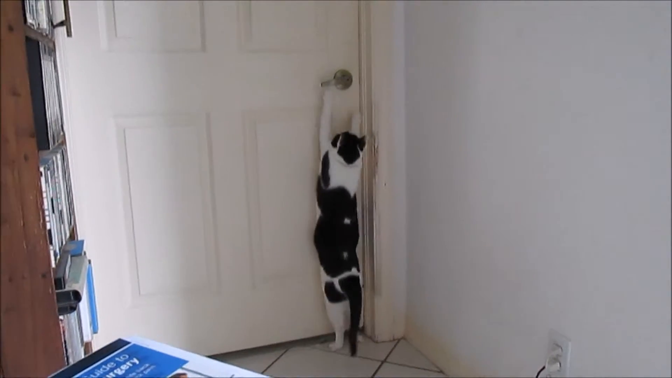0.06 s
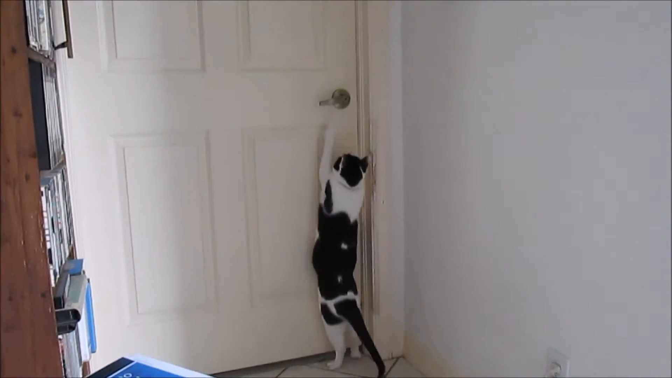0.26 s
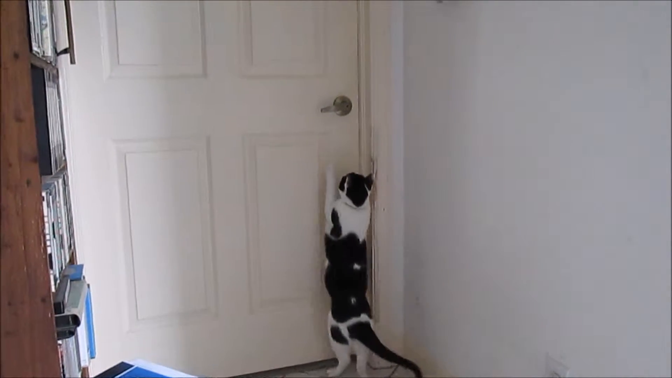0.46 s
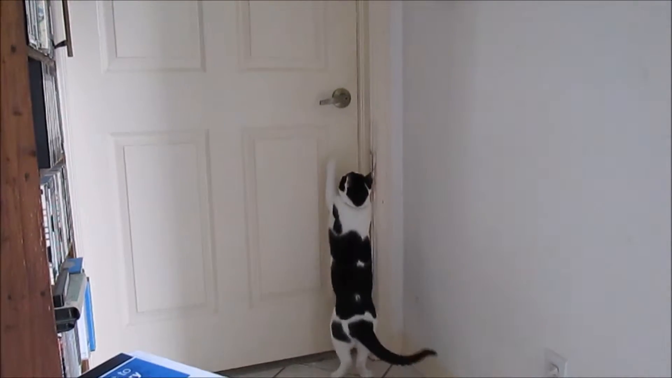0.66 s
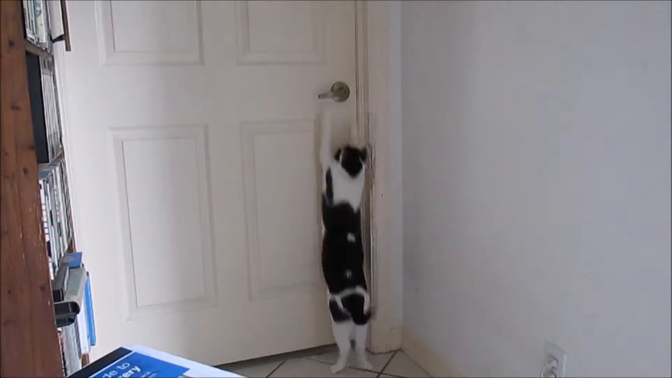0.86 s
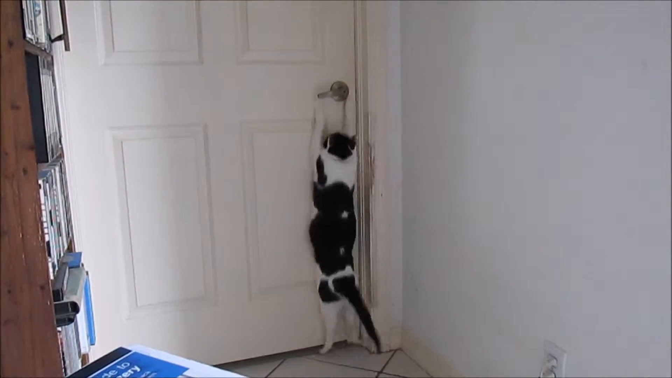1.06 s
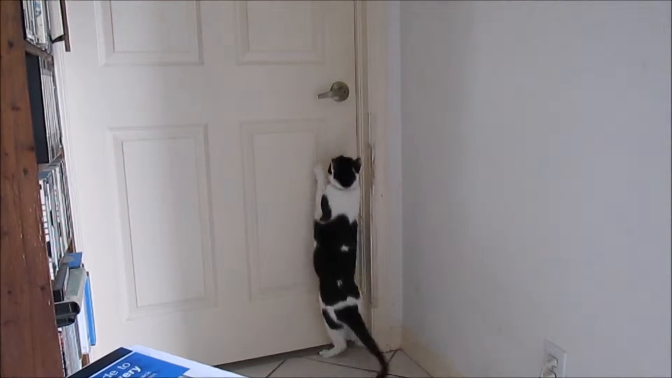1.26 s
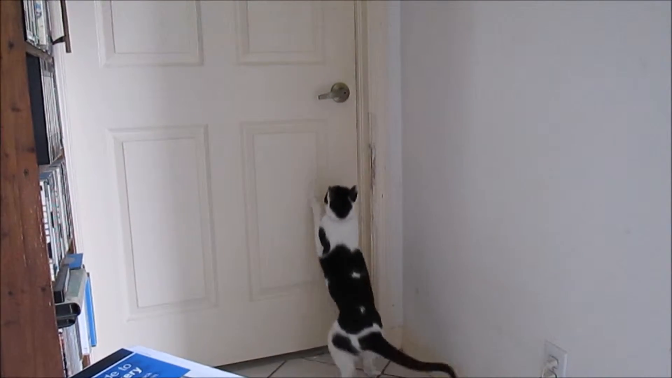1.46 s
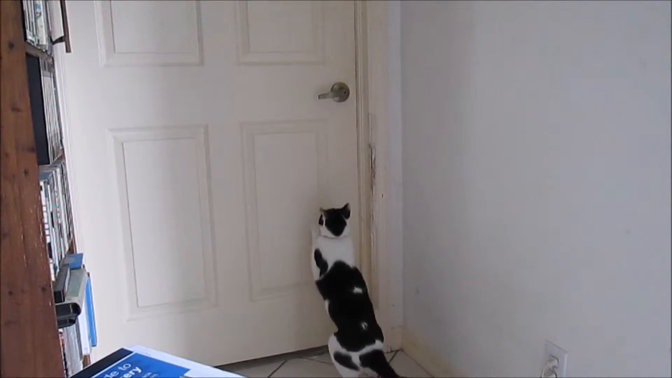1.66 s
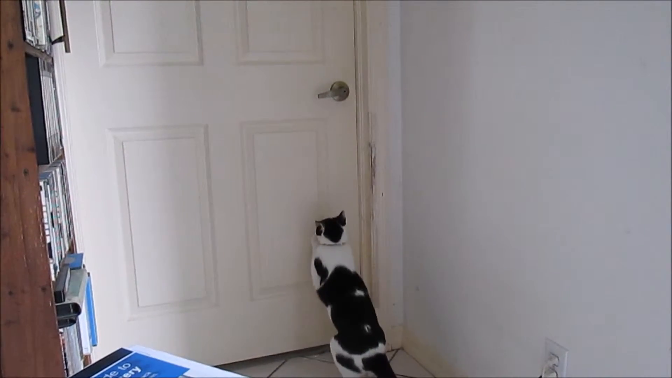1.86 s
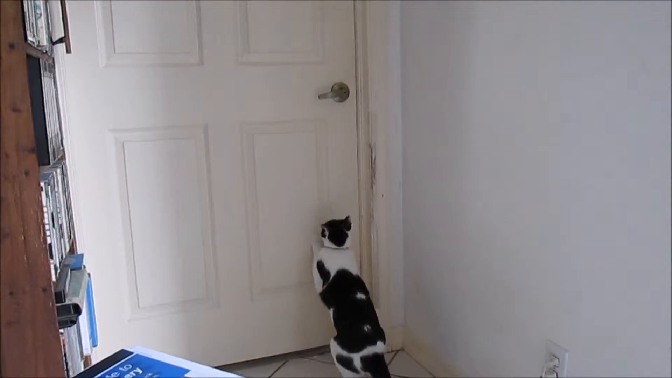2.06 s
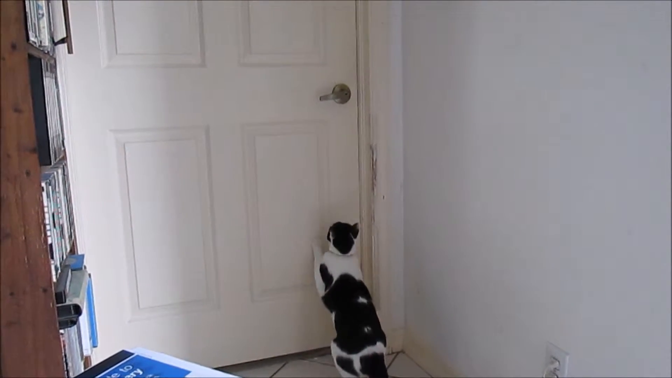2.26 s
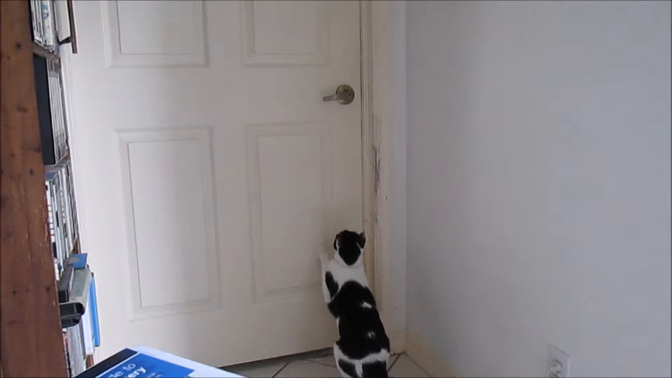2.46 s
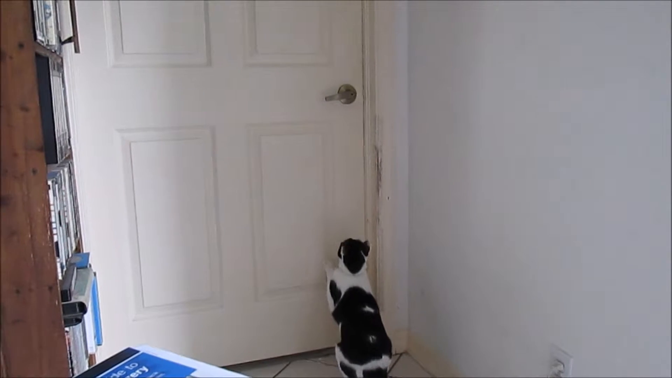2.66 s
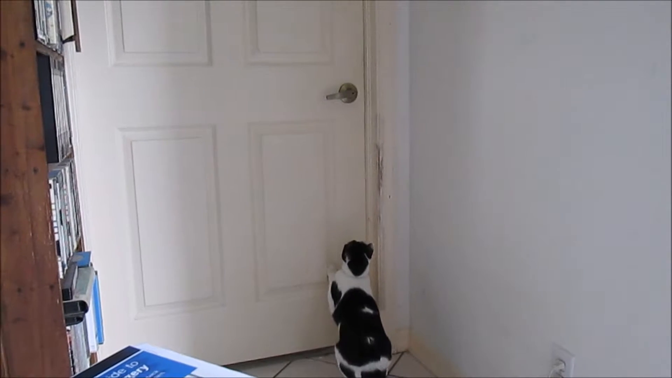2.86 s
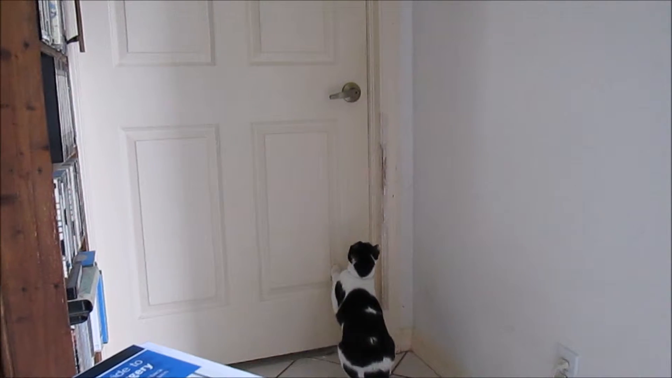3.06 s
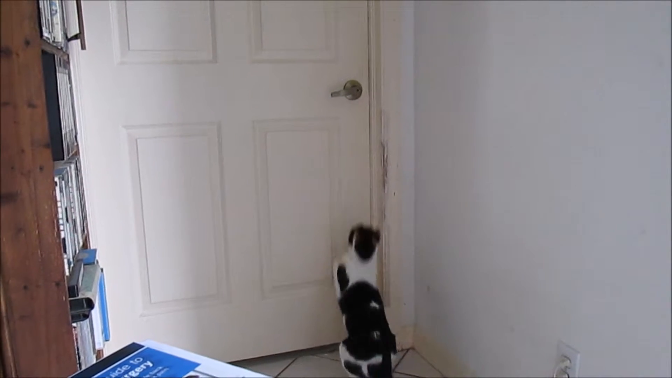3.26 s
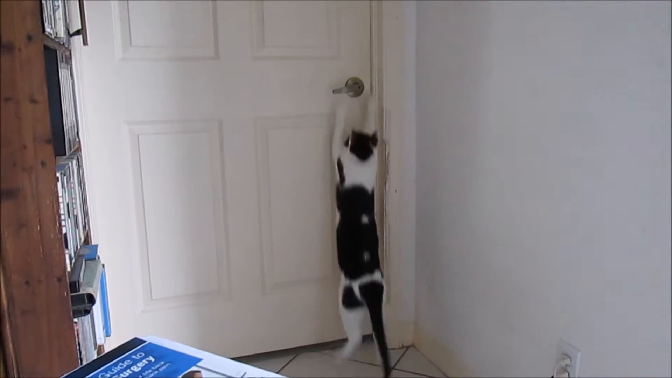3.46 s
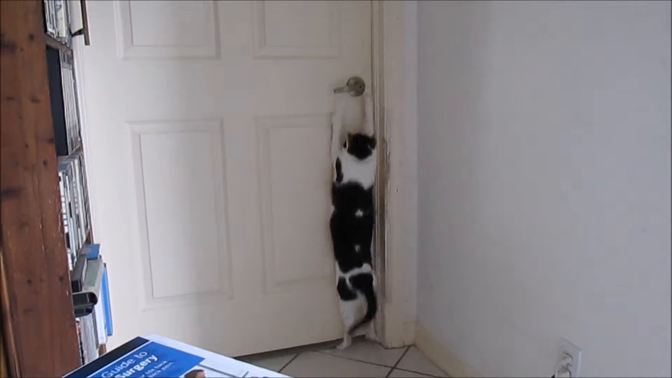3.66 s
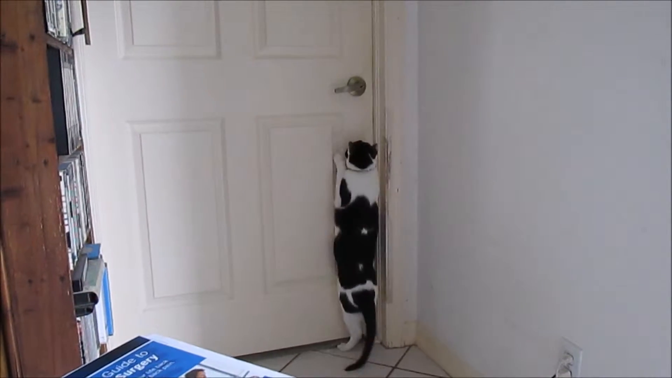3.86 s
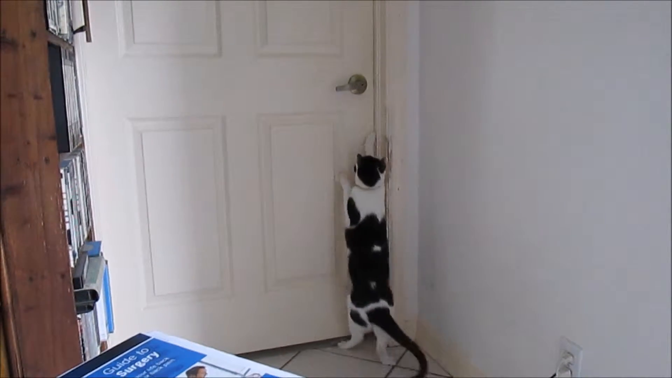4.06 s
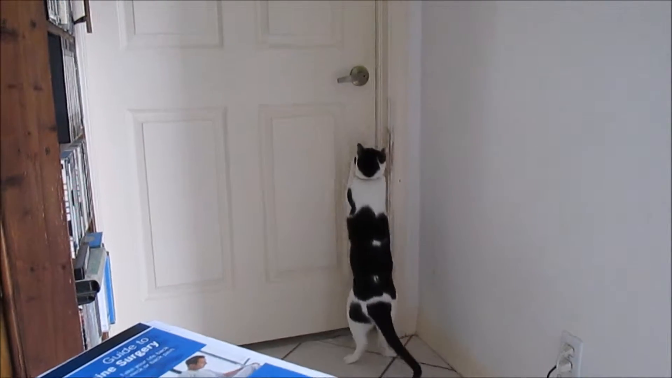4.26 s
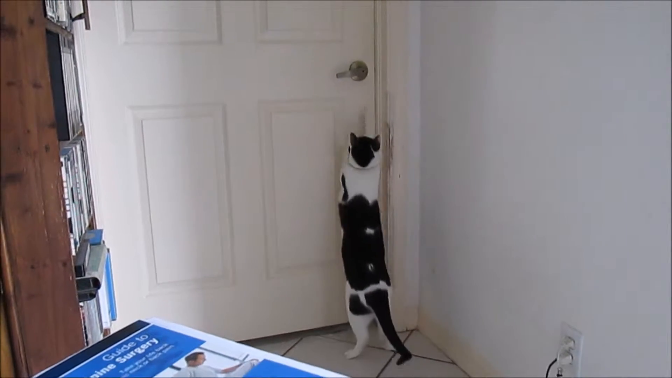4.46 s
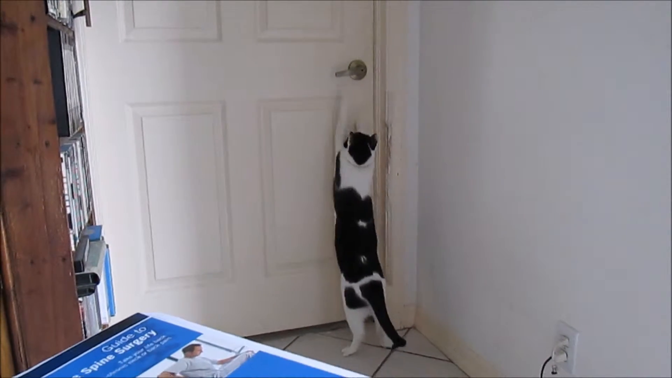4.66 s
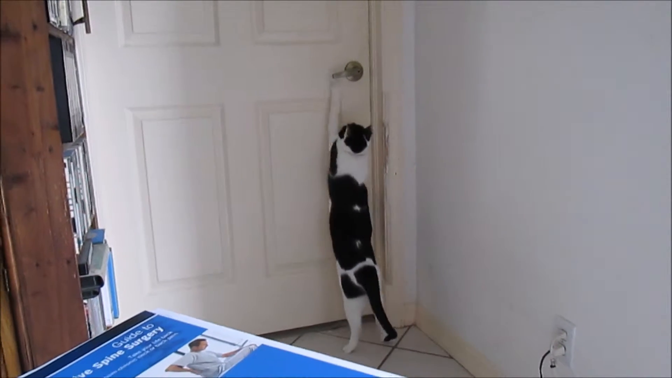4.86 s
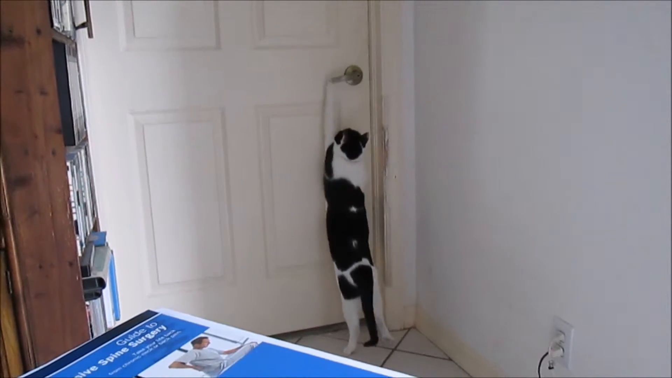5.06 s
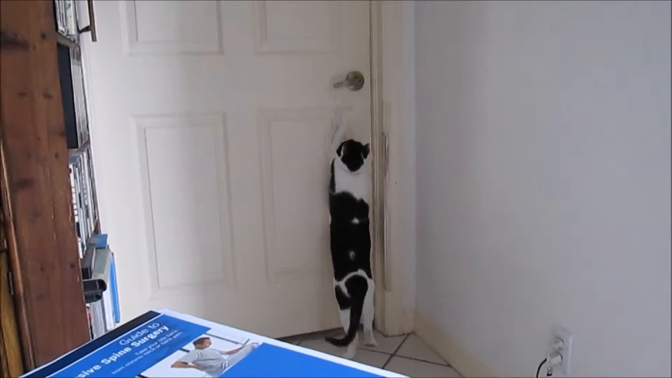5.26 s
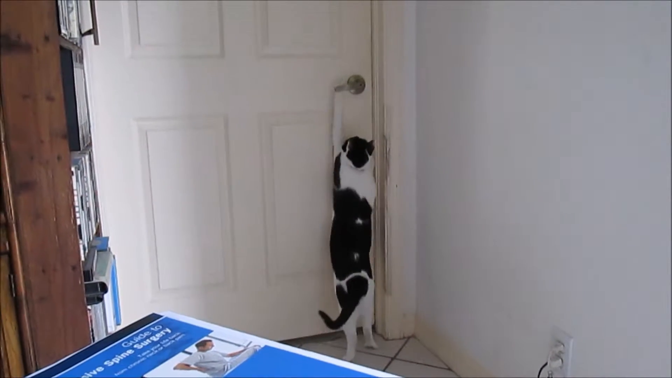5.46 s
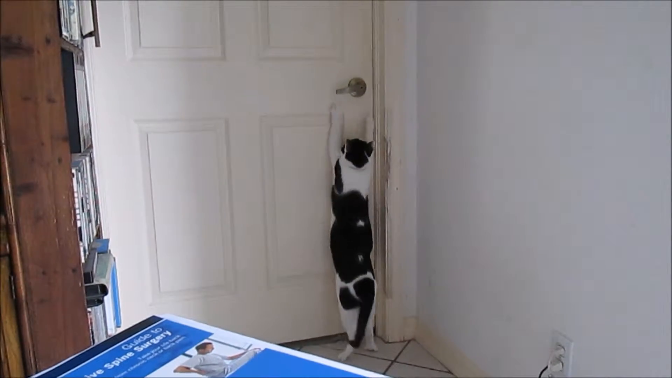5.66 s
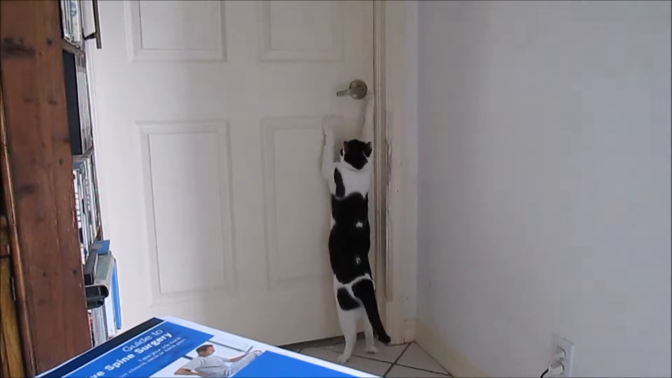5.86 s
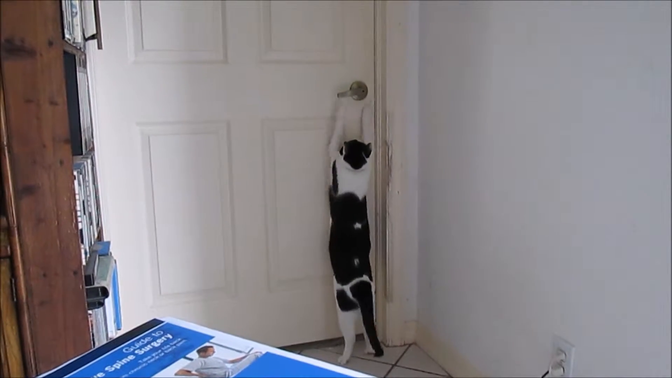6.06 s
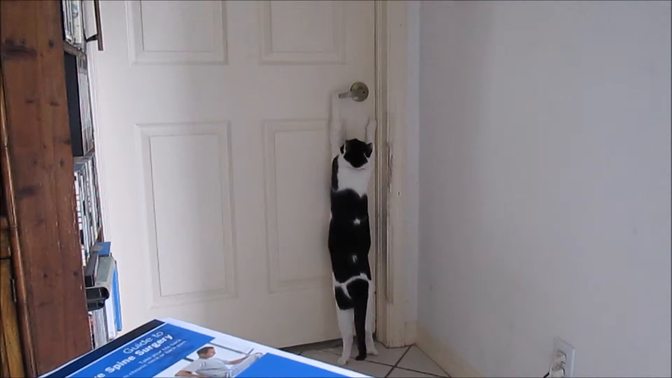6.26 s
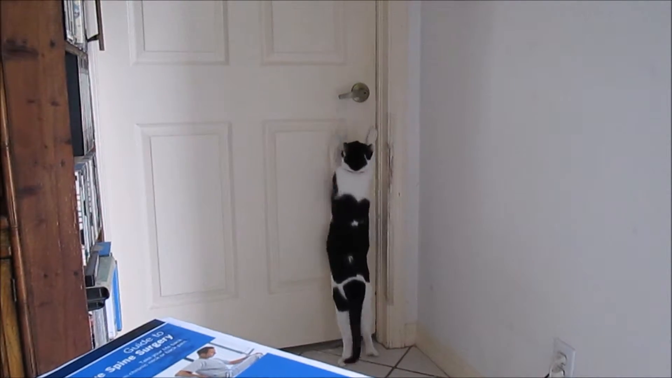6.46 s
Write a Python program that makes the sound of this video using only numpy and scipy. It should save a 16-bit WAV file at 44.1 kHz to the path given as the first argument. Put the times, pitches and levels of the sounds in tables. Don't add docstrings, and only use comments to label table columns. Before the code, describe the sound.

A cat's paws thump a hollow door, latch rattling and collar tags jingling, then claws scratch and slip down the paint in a tiled hallway.

```python
import sys
import numpy as np
from scipy import signal
from scipy.fft import rfft, irfft
from scipy.io import wavfile
from scipy.ndimage import uniform_filter1d

SR = 44100
rng = np.random.default_rng(int(sys.argv[2]) if len(sys.argv) > 2 else 0)


def unload_audio(sound):
    columns = np.transpose(np.atleast_2d(sound))
    steps = np.round(np.clip(columns, -1, 1) * 32767)
    wavfile.write(sys.argv[1], SR, steps.astype(np.int16))


def volts_from_db(level):
    exponent = np.asarray(level, float) / 20
    return 10 ** exponent


N = 286864


def rms_one(x):
    return x / np.sqrt(np.mean(x ** 2) + 1e-20)


def at_hz(points, hz):
    table_hz, values = np.array(points).T
    return np.interp(np.log(hz), np.log(table_hz), values)


def coloured(x, spectrum, lead=((1, 0), (2, 0))):
    size = x.shape[-1]
    hz = np.arange(size // 2 + 1) * SR / size + 1
    return irfft(rfft(x) * volts_from_db(at_hz(spectrum, hz)) * np.exp(1j * at_hz(lead, hz)), size)


def ring(clicks, hz, t60):
    r = volts_from_db(-60 / (t60 * SR))
    w = 2 * np.pi * hz / SR
    return signal.lfilter([0, np.sin(w)], [1, -2 * r * np.cos(w), r * r], clicks + 1e-18)


def band_pass(order, low_hz, high_hz, x):
    return signal.sosfilt(signal.butter(order, [low_hz, high_hz], "band", fs=SR, output="sos"), x)


def grains(size, spread_db):
    height = volts_from_db(spread_db * np.minimum(rng.exponential(1, size), 5))
    return rms_one(height * rng.choice([-1, 1], size))


def bursts(rise_s, length_s, spread_db, bend, size=4096):
    t = np.arange(1, size + 1) / SR
    swell = 1 - np.exp(-t / np.clip(rise_s, 1e-5, .1)[:, None])
    fade = np.exp(-(t / np.clip(length_s, .0004, .2)[:, None]) ** bend)
    return grains((len(length_s), size), spread_db) * swell * fade


def add(track, rows, times, level_db):
    for row, s, gain in zip(rows, times, volts_from_db(level_db).T):
        at = round(s * SR)
        peak_one = row / np.abs(row).max()
        track[..., at:at + len(row)] += np.multiply.outer(gain, peak_one)[..., :N - at]
    return track


def knocks(s, peak_db, deep_db, sharp_db, contact_s):
    # f/Hz, level/dB
    modes_by_depth = [
        [(110, -3), (150, -34), (190, 0), (230, -2.5), (285, 1.5), (335, 4.5), (385, 7.5), (430, -34)],
        [(475, -6), (520, -21), (575, 9.5), (625, 13), (668, 12.5), (715, 0), (765, 12.5), (830, -2),
         (895, -11), (937, 8), (985, 5.5)],
        [(1055, 0.5), (1150, 6.5), (1240, 10.5), (1340, 13), (1410, -30), (1530, 9.5), (1700, 4.5), (1900, 2)],
    ]
    contact = bursts(s * 0 + 0.0037, s * 0 + contact_s, spread_db=3.5, bend=0.99, size=8192)
    out = np.zeros(N)
    for modes, share_db in zip(modes_by_depth, (deep_db - 0.5, -2.5, sharp_db + 3.0)):
        sound = volts_from_db(-1.0) * ring(contact, 2300, 0.0011)
        for hz, level_db in modes:
            strength = volts_from_db(level_db + rng.normal(0, 0.21, (len(s), 1)))
            strength = strength * rng.choice([-1, 1], (len(s), 1))
            t60 = 0.039 * (700 / hz) ** 0.71
            sound = sound + strength * ring(contact, hz, t60)
        add(out, sound, s, peak_db + share_db)
    return out


def thumps():
    # t/s, level/dB (peak), level/dB (deep modes share)
    landings = [(0.062, -39, -1.5), (0.468, -45, -2), (0.983, -37, 6), (1.031, -26.5, 3),
                (1.102, -25, -9.5), (1.147, -39, 0.5), (1.28, -33, 0), (3.64, -40.5, -7), (3.744, -31, 1),
                (3.758, -24, -3.5), (3.787, -25, -6), (3.831, -21.5, -4), (3.842, -50, -10),
                (3.894, -29, 5), (3.943, -38, 4), (4.001, -69, 19), (4.14, -42, 1.5), (4.886, -39, 3.5),
                (5.056, -38.5, -6), (5.16, -24.5, -3.5), (5.301, -35, -6), (5.602, -30.5, -0.5),
                (5.632, -29, -4.5), (6.219, -29, -6.5), (6.247, -27, -6.5), (6.413, -48, 2)]
    s, peak_db, deep_db = np.transpose(landings)
    return knocks(s, peak_db, deep_db, sharp_db=-10, contact_s=0.013)


def raps():
    # t/s, level/dB (peak), level/dB (sharp modes share)
    blows = [(0.299, -53, 2), (0.985, -31, 6), (0.994, -16.5, -4), (1.016, -18.5, -8), (1.05, -19.5, -6.5),
             (1.088, -12.5, -11.5), (1.103, -16.5, -8), (1.134, -18, -11.5), (1.168, -36, 5),
             (1.2, -48, 15), (2.57, -53, 5.5), (2.67, -44.5, 1.5), (3.24, -40.5, -4), (4.078, -36, -21),
             (4.604, -53, 15), (5.567, -30, -11), (5.583, -29.5, -9), (6.192, -35.5, 4.5),
             (6.37, -36.5, -1.5), (6.399, -23.5, -5.5), (6.405, -32, -24)]
    s, peak_db, sharp_db = np.transpose(blows)
    return knocks(s, peak_db, -17, sharp_db, contact_s=0.014)


def ticks(table, length_s, pan_db):
    s, peak_db, centre_hz = np.transpose(table)
    contact = bursts(s * 0 + 0.000068, s * 0 + length_s, spread_db=1.5, bend=0.72, size=2048)
    contact[:, 8] += volts_from_db(12.5)
    sound = []
    for row, hz in zip(contact, centre_hz):
        wide = band_pass(1, 0.33 * hz, min(12.0 * hz, 18000), row)
        sound.append(volts_from_db(14.5) * ring(wide, hz, 7.9 / hz) + wide)
    pan_db = pan_db + 9.5 * rng.standard_normal(len(s))
    return add(np.zeros((2, N)), sound, s, peak_db - 15.5 + np.outer([.5, -.5], pan_db))


def latch():
    # t/s, level/dB (peak), f/Hz (centre)
    clicks = [(0.0445, -19, 2450), (0.079, -25, 2560), (0.9855, -23, 3010), (0.9951, -9, 2950),
              (1.07, -28, 3210), (1.0835, -2, 2800), (1.0905, 3, 3100), (1.1022, 1, 3000),
              (1.1055, -26, 3160), (1.248, -19, 2330), (1.762, -26.5, 2730), (2.007, -34.5, 3520),
              (2.5676, -26, 2530), (3.8325, -12, 2400), (4.1026, -30, 3460), (4.6076, -8, 5300),
              (5.1624, -13.5, 3400), (5.5987, -35, 3300), (6.0388, -23, 2700), (6.2226, -5, 3400),
              (6.403, -10.5, 3600)]
    return ticks(clicks, length_s=0.0046, pan_db=2.5)


def claw_tips():
    # t/s, level/dB (peak), f/Hz (centre)
    taps = [(0.171, -17.5, 5200), (0.9865, -4, 9400), (1.0636, 1, 5850), (1.256, -5, 6900),
            (1.3386, -9.5, 5500), (1.9131, -25, 5140), (3.349, -25, 7500), (3.388, -45, 5580),
            (3.402, -10.5, 7360), (3.533, -27, 7650), (3.573, -13, 6400), (3.6795, -8, 6400),
            (3.7225, -12, 6360), (3.732, -3, 7500), (3.752, -4.5, 6730), (3.769, -10, 5600),
            (3.8484, -0.5, 6560), (3.975, -25, 6770), (4.16, -23, 9700), (4.75, -27, 5800),
            (4.884, -4.5, 4100), (4.888, -3.5, 6940), (5.166, -14.5, 7600), (5.602, -5.5, 6740),
            (5.683, -16, 9500), (5.826, -14, 4940), (5.8296, -5.5, 7340), (6.1726, -17, 6300),
            (6.2266, -2, 6300)]
    return ticks(taps, length_s=0.0034, pan_db=0)


def swipes(table, rise_s, rise_share, pad_db=0, size=16384):
    # f/Hz, level/dB
    paint = [(700, -56), (1200, 15), (2000, 8), (3200, 10), (6000, 21.5), (9000, 15), (12000, 8),
             (16500, 1.5)]
    s, peak_db, centre_hz, length_s = np.transpose(table)
    friction = bursts(rise_s + rise_share * length_s, length_s, spread_db=5.5, bend=1.87, size=size)
    grip = rms_one(uniform_filter1d(rng.standard_normal((3, *friction.shape)), size=400))
    grip_db = (3, 5, 0.5)
    pad, claw, claw2 = friction * volts_from_db(np.multiply(grip_db, grip.T).T)
    second_hz = np.minimum(centre_hz, 3700) * rng.uniform(1.256, 1.99, len(s))
    sound = []
    for dull, row, row2, hz, hz2 in zip(coloured(pad, paint), claw, claw2, centre_hz, second_hz):
        first_squeak = rms_one(ring(row, hz, 10.0 / hz))
        second_squeak = rms_one(ring(row2, hz2, 20.0 / hz2))
        sound.append(volts_from_db(pad_db) * rms_one(dull) + volts_from_db(-3.0) * first_squeak + volts_from_db(-6) * second_squeak)
    return add(np.zeros(N), sound, s, peak_db - 0.5)


def slaps():
    # t/s, level/dB (peak), f/Hz (bright centre), length/s
    skids = [(0, -27.5, 5000, 0.063), (1.1005, -2.5, 3240, 0.0061), (1.126, -18, 2940, 0.047),
             (1.244, -38, 5360, 0.23), (2.557, -40, 2500, 0.018), (3.299, -37, 3600, 0.03),
             (3.412, -34.5, 3470, 0.031), (3.635, -30.5, 3560, 0.089), (3.678, -25, 7000, 0.1),
             (3.72, -20, 3190, 0.18), (3.832, -18.5, 3700, 0.018), (3.997, -28.5, 3200, 0.057),
             (4.183, -35, 5640, 0.086), (4.609, -20, 5300, 0.073), (4.885, -22.5, 3400, 0.084),
             (5.599, -23.5, 3880, 0.043), (5.82, -22.5, 4560, 0.066), (6.038, -27, 2980, 0.015),
             (6.2225, -22, 3760, 0.055), (6.398, -20.5, 3730, 0.016)]
    return swipes(skids, rise_s=0.0004, rise_share=0)


def drags():
    # t/s, level/dB (peak), f/Hz (bright centre), length/s
    strokes = [(0.286, -42, 3150, 0.018), (0.986, -16.5, 3920, 0.036), (1.048, -25, 3400, 0.029),
               (1.419, -24, 5200, 0.033), (1.498, -36.5, 5630, 0.0074), (1.761, -35, 3150, 0.084),
               (2.693, -35, 3800, 0.04), (3.248, -36, 3200, 0.027), (3.866, -29.5, 3180, 0.058),
               (4.092, -30, 3550, 0.022), (4.225, -35, 3300, 0.089), (4.785, -37.5, 5230, 0.2),
               (5.18, -26, 3970, 0.16), (5.258, -24, 4400, 0.081), (5.44, -60, 6060, 0.026),
               (5.64, -26.5, 3360, 0.2), (5.715, -40, 3230, 0.18), (5.9, -31, 4100, 0.088),
               (5.962, -26, 3400, 0.053), (6.125, -32.5, 3420, 0.25), (6.295, -36, 3470, 0.17),
               (6.35, -32, 3370, 0.063)]
    return swipes(strokes, rise_s=0.005, rise_share=0.014)


def flecks():
    # t/s, level/dB (peak), f/Hz (bright centre), length/s
    snags = [(5.195, -43, 6500, 0.0097), (5.217, -24.5, 3060, 0.047), (5.288, -26, 3350, 0.031),
             (5.318, -27, 5560, 0.007), (5.664, -29, 3630, 0.014), (5.675, -27.5, 3280, 0.025),
             (5.721, -30, 3360, 0.021), (5.745, -28, 5500, 0.036), (5.808, -37, 4500, 0.015),
             (5.922, -36, 4000, 0.015), (5.94, -27.5, 5330, 0.013), (5.985, -29, 3190, 0.029),
             (6.057, -31.5, 5570, 0.016), (6.15, -46, 3630, 0.022), (6.248, -34.5, 4000, 0.035),
             (6.3, -33.5, 3420, 0.014)]
    return swipes(snags, 0.003, 0.15, pad_db=-4.5, size=4096)


def spots(table, cycles=13, narrowing=0):
    s, peak_db, spot_hz, length_s = np.transpose(table)
    contact = bursts(0.054 * length_s, length_s, spread_db=1.5, bend=1.46, size=8192)
    sound = []
    for row, hz in zip(contact, spot_hz):
        resonance = ring(row, hz, cycles * (hz / 500) ** narrowing / hz)
        sound.append(ring(resonance, hz, 1.07 / hz))
    return add(np.zeros(N), sound, s, peak_db)


def pats():
    # t/s, level/dB (peak), f/Hz (spot), length/s
    touches = [(0.994, -17, 560, 0.012), (0.996, -18, 1240, 0.016), (1.022, -27.5, 457, 0.047),
               (1.091, -18, 635, 0.0055), (1.1015, -9.5, 704, 0.0081), (1.1019, -14, 1320, 0.0069),
               (1.117, -21, 667, 0.011), (1.133, -26.5, 850, 0.054), (1.205, -30, 814, 0.051),
               (1.255, -30.5, 1550, 0.065), (1.275, -34, 268, 0.031), (3.832, -20.5, 593, 0.0035),
               (3.9, -39, 710, 0.0086), (4.006, -34, 2900, 0.025), (4.212, -38.5, 1360, 0.098),
               (4.89, -32, 610, 0.019), (5.059, -34, 690, 0.011), (5.602, -48, 600, 0.0089),
               (5.636, -50, 506, 0.016), (5.164, -45, 755, 0.0079), (5.3, -33.5, 1250, 0.064),
               (6.25, -35, 950, 0.028), (6.402, -16.5, 970, 0.0055), (6.43, -36.5, 980, 0.1)]
    return spots(touches)


def squeaks():
    # t/s, level/dB (peak), f/Hz (band), length/s
    slips = [(0, -55, 1840, 0.043), (1.0905, -10.5, 3060, 0.0011), (1.1025, -10.5, 2870, 0.0016),
             (1.104, -10, 3170, 0.0051), (1.765, -38, 2520, 0.031), (3.832, -19.5, 930, 0.00051),
             (3.9745, -28, 7000, 0.0047), (4.079, -37, 1120, 0.0059), (4.62, -50, 5150, 0.052),
             (4.62, -33, 3180, 0.059), (5.275, -29.5, 3260, 0.013), (5.6013, -20, 3380, 0.00086),
             (5.722, -33.5, 3340, 0.052), (5.925, -41, 3480, 0.029), (5.975, -30.5, 3300, 0.021),
             (6.0388, -37, 2330, 0.0014), (6.405, -36.5, 326, 0.041)]
    return spots(slips)


def catches():
    # t/s, level/dB (peak), f/Hz (band), length/s
    snatches = [(0.046, -40.5, 1500, 0.0092), (1.017, -23, 2650, .002), (1.0705, -20, 4570, 0.0024),
                (1.107, -12, 5230, 0.0026), (1.133, -23, 1500, 0.0027), (1.775, -39, 4420, 0.025),
                (2.672, -54, 1250, 0.022), (2.695, -46, 3120, .012), (2.695, -44, 4000, 0.014),
                (2.696, -41, 6070, 0.011), (2.715, -47, 5300, .015), (2.716, -54, 3250, 0.018),
                (2.72, -45, 6140, .015), (3.757, -28, 394, 0.01), (3.763, -36, 610, 0.018),
                (3.788, -28, 600, 0.015), (3.83, -25, 221, 0.013), (3.842, -35, 670, 0.011),
                (3.962, -30, 237, 0.014), (4.612, -39, 6500, 0.0092), (4.633, -34, 5030, .028),
                (4.65, -41, 3200, .015), (4.665, -33.5, 5250, 0.028), (4.675, -41, 6800, .02),
                (5.603, -32, 3100, .015), (5.665, -34, 3300, 0.045), (5.735, -42, 3600, 0.037),
                (5.81, -39, 4400, .02), (5.9, -45, 8300, 0.094), (5.93, -44, 3130, 0.095),
                (5.95, -44, 1410, 0.075), (1.085, -25, 6460, 0.022), (1.092, -27, 2960, 0.0064),
                (1.785, -42, 2760, 0.025), (1.775, -45, 6150, 0.034), (3.258, -53, 3150, .012),
                (3.303, -50, 3250, .012), (3.374, -42, 5650, 0.0089), (3.535, -43, 6750, 0.024),
                (3.598, -47, 6400, 0.018), (3.682, -31, 5100, .014), (5.217, -39, 3160, 0.014),
                (5.285, -33, 3200, 0.032), (5.285, -38, 5000, .02), (5.578, -28, 1260, .004),
                (5.595, -27.5, 517, 0.0075), (6.195, -34, 1270, .006), (6.3, -38, 3380, .015),
                (6.252, -33, 3630, .015)]
    return spots(snatches, cycles=10.6, narrowing=0.73)


def hollows():
    # t/s, level/dB (peak), f/Hz (spot), length/s
    answers = [
        (0.997, -27, 1020, 0.0072),
        (1.1025, -16, 1020, 0.0029),
        (1.103, -16.5, 610, 0.0037),
        (1.115, -23, 660, .008),
        (4.888, -30, 645, 0.024),
        (5.165, -33, 530, 0.0085),
        (5.571, -42.5, 3000, 0.029),
        (6.404, -30, 550, .01),
        (5.2, -34, 620, 0.015),
        (3.975, -33, 6200, .0015),
    ]
    return spots(answers, cycles=14.0)


def tags(touches, t60, split_hz, trim_db, touch_s):
    s, peak_db, ring_hz = np.transpose(touches)
    contact = bursts(s * 0 + 0.00012, s * 0 + touch_s, spread_db=5, bend=0.62)
    front, aside = [], []
    for row, hz in zip(contact, ring_hz):
        click = np.diff(row, prepend=0)
        front.append(ring(row, hz, t60) + volts_from_db(6) * click)
        aside.append(ring(row, hz + split_hz, t60 * 0.52))
    turn_db = 4.5 * np.outer([1, -1], rng.standard_normal(len(s)))
    out = add(np.zeros((2, N)), front, s, peak_db + trim_db + turn_db / 2)
    return add(out, aside, s, peak_db + trim_db - 11.5 - turn_db)


def thin_tag():
    # t/s, level/dB (peak), level/dB (upper mode share)
    jingles = [(0.0194, -46, -4), (0.0594, -42, -12), (0.902, -54, 8), (1.0214, -40, -14), (1.09, -16, -8),
               (1.1007, -30, -10), (1.152, -30, -10), (1.177, -32.5, -3), (1.2473, -18.5, -12),
               (1.2604, -28, -14), (1.3494, -44, -13), (3.3493, -40, -7), (3.386, -44, 6),
               (3.4043, -30.5, -3), (3.4384, -38.5, 0), (3.482, -38.5, -2), (3.5325, -36.5, -10),
               (3.574, -32, -12), (3.616, -33.5, -18), (3.6804, -28, -14), (3.692, -20, -13),
               (3.7273, -11.5, -18), (3.777, -27, -14), (3.809, -16.5, -17), (3.848, -12, -16),
               (3.854, -18.5, 5), (3.885, -44, 1), (4.236, -52, 10), (5.681, -35, 4), (6.279, -41, 0)]
    s, peak_db, upper_db = np.transpose(jingles)[..., None]
    swing = np.arange(3)
    rebound_s, rebound_loss_db = 0.018, 17
    s = (s + rebound_s * swing * rng.uniform(0.96, 3.4, (len(s), 3))).ravel()
    peak_db = peak_db - rebound_loss_db * swing
    off_hz = 35 * rng.standard_normal(len(s))
    lower = np.transpose([s, peak_db.ravel(), 11520 + off_hz])
    upper = np.transpose([s, (peak_db + upper_db).ravel(), 12120 - 2 * off_hz])
    return tags(np.vstack([lower, upper]), t60=0.037, split_hz=90, trim_db=-5.0, touch_s=0.0067)


def thick_tag():
    # t/s, level/dB (peak), f/Hz (ring)
    clinks = [(0.3476, -51.5, 6500), (0.4499, -58, 6470), (0.9018, -55, 7100), (0.9632, -39.5, 5400),
              (1.1894, -47, 7200), (1.2545, -34, 7350), (1.5094, -74, 5540), (1.6182, -58, 5630),
              (1.6606, -56, 5430), (1.665, -57, 6400), (1.703, -56, 5700), (1.706, -57, 6400),
              (3.3044, -45.5, 6030), (3.3483, -45, 7260), (3.3882, -38, 5710), (3.4094, -54, 5560),
              (3.42, -42.5, 5660), (3.4394, -49, 6900), (3.4794, -49, 5670), (3.5329, -51, 7120),
              (3.554, -44, 5700), (3.5894, -43, 5720), (3.6194, -51, 6500), (3.8546, -30, 5600),
              (4.1749, -36, 5830), (4.18, -47, 5570), (4.186, -61, 6400), (4.7391, -44.5, 5690),
              (4.815, -48, 5270), (5.447, -51, 6400), (5.47, -47, 5800), (6.0786, -45.5, 6300)]
    return tags(clinks, t60=0.019, split_hz=190, trim_db=7.5, touch_s=0.0083)


def sway():
    # t/s, level/dB (peak), f/Hz, rise/s, t60/s
    rocking = [(0, -49, 43.8, 0.0046, 0.98), (1.0, -55, 60, 0.022, 0.6), (1.201, -40, 48, 0.033, 0.95),
               (1.3, -37.5, 26.1, 0.069, 0.63), (3.756, -27.5, 67.6, 0.0032, 0.12),
               (3.828, -35.5, 47.5, 0.025, 0.79), (4.02, -41.5, 42.3, 0.062, 0.55),
               (4.2, -48, 27, 0.13, 0.68), (4.884, -42, 63, 0.0074, 0.34), (5.166, -51, 59.6, 0.0055, 0.17),
               (5.6, -49, 63.5, 0.038, 0.16), (6.22, -50, 49.7, 0.022, 0.38)]
    s, peak_db, hz, rise_s, t60 = np.transpose(rocking)[..., None]
    t = np.arange(SR) / SR
    swings = (1 - np.exp(-t / rise_s)) * volts_from_db(-60 * t / t60) * np.sin(2 * np.pi * hz * t)
    return add(np.zeros(N), swings, s[:, 0], peak_db[:, 0])


def alike(mid, side, share):
    share = np.clip(share, -1, 1)
    common, apart = np.sqrt(1 + share) * mid, np.sqrt(1 - share) * side
    return np.array([common + apart, common - apart])


def hallway(x):
    # f/Hz, t60/s
    hall_t60 = [(100, 0.94), (700, 0.64), (3000, 0.68), (8000, 0.56), (14000, 0.95)]
    # f/Hz, left-right likeness/1
    likeness = [(60, 1), (180, 0.87), (550, 0.79), (1650, 0.54), (4970, 0.14), (15000, 0.15)]
    t, tail = np.arange(SR) / SR, 0
    mid, side = rng.standard_normal((2, SR))
    for hz in 60 * 2.0 ** np.arange(9):
        white = alike(mid, side, at_hz(likeness, hz))
        corner = volts_from_db(17 - 60 * t / 0.03)
        decay = volts_from_db(-60 * t / at_hz(hall_t60, hz)) + corner
        tail = tail + band_pass(2, hz / np.sqrt(2), min(hz * np.sqrt(2), .45 * SR), white) * decay
    tail = tail * (1 - np.exp(-t / 0.0031))
    return signal.fftconvolve(x[None], rms_one(tail) / np.sqrt(SR), axes=1)[:, :N]


def air():
    # f/Hz, level/dB
    vent = [(15, -11), (30, -1), (75, -4.5), (115, -0.5), (150, -4.5), (185, 1.5), (250, 1.5), (400, -6.5),
            (900, -11), (1500, -14), (2000, -21), (4500, -25), (6200, -21.5), (8500, -27), (16500, -35.5)]
    # f/Hz, left-right likeness/1
    likeness = [(60, 0.73), (130, 0.84), (290, 0.84), (640, 0.64), (1410, 0.35), (3100, 0.098),
                (6820, -0.3), (15000, 0.14)]
    mid, side = rfft(coloured(rng.standard_normal((2, N)), vent))
    hz = np.arange(len(mid)) * SR / N + 1
    noise = rms_one(irfft(alike(mid, side, at_hz(likeness, hz)), N))
    whine_hz, whine_width_hz = 6000, 3
    whine = rms_one(ring(rng.standard_normal(N), whine_hz, np.log(1000) / np.pi / whine_width_hz))
    return volts_from_db(-49) * noise + volts_from_db(-73) * whine


def microphone_pair(heard):
    # f/Hz, level/dB
    sideways = [(60, -5), (130, 1), (290, -0.5), (640, -0.5), (1410, -2), (3100, -2), (6820, 1), (15000, 3)]
    # f/Hz, phase/rad
    left_lead = [(0, 0), (3190, -0.39), (4910, -1.21), (8270, -1.1), (9560, 1), (11500, -1.57),
                 (12100, -0.79), (16500, -0.82)]
    ports = []
    for x, half in zip(heard, ([1, .5], [1, -.5])):
        ports.append(coloured(x, np.multiply(sideways, half), np.multiply(left_lead, half)))
    return np.array(ports)


def scene():
    door = thumps() + raps() + slaps() + drags() + flecks() + pats() + latch() + claw_tips()
    door = signal.sosfilt(signal.butter(2, 90, "high", fs=SR, output="sos"), door)
    collar = thin_tag() + thick_tag()
    heard = door + collar + hallway(door.mean(axis=0) + volts_from_db(-22) * collar.mean(axis=0))
    for sound, hall_db in ((squeaks(), -3.5), (catches(), -0.5), (hollows(), -5.0)):
        heard = heard + sound + volts_from_db(hall_db) * hallway(sound)
    return microphone_pair(heard) + sway() + air()


def band_limit(x):
    return signal.sosfilt(signal.butter(12, 16940, fs=SR, output="sos"), x)


def record(dry):
    dip_hz, dip_width_hz, dip_depth = 7780, 190, 0.55
    dip = signal.lfilter(*signal.iirpeak(dip_hz, dip_hz / dip_width_hz, fs=SR), dry)
    rounded = 1.1 * np.tanh((dry - dip_depth * dip) / 1.1)
    top_cut = signal.sosfilt(signal.cheby2(12, 60, 16450, fs=SR, output="sos"), rounded)
    return band_limit(top_cut)


dry = scene()
out = record(dry)
unload_audio(out)
```